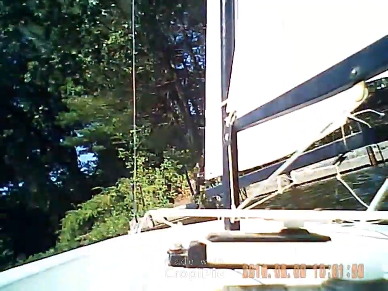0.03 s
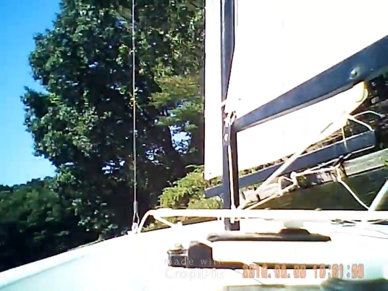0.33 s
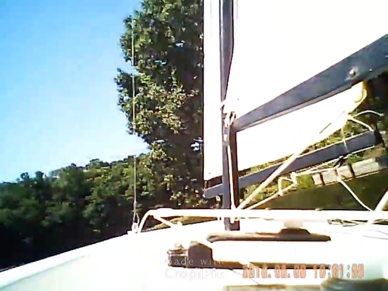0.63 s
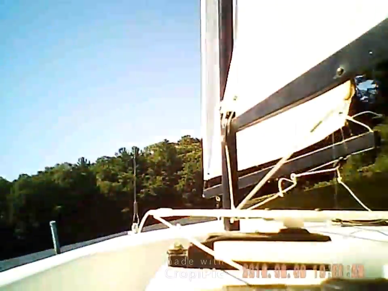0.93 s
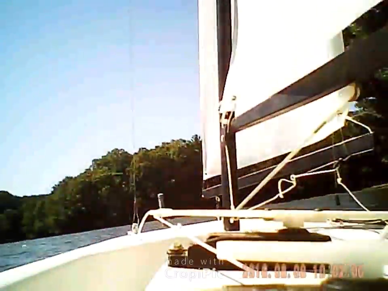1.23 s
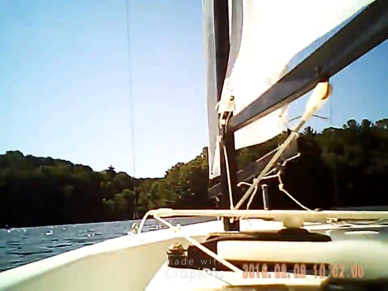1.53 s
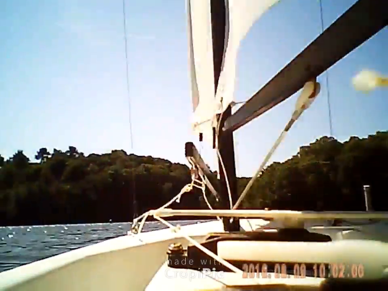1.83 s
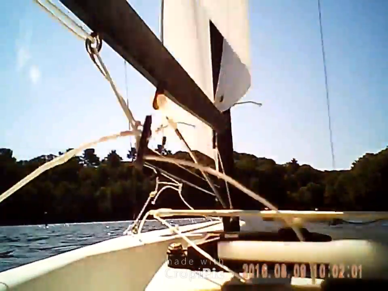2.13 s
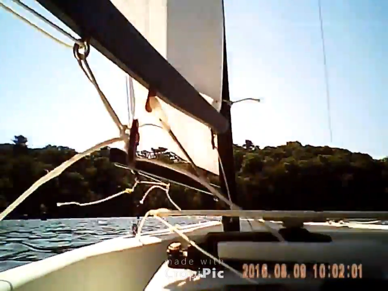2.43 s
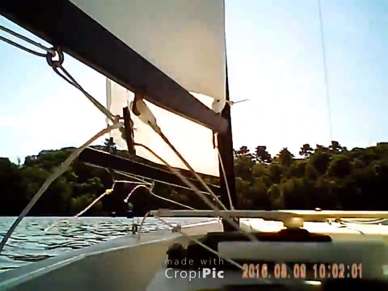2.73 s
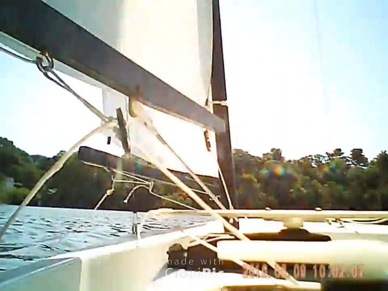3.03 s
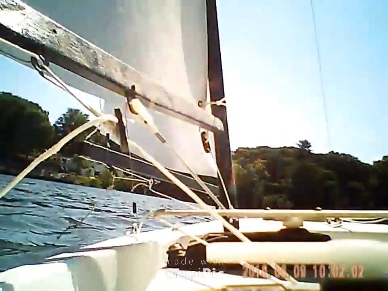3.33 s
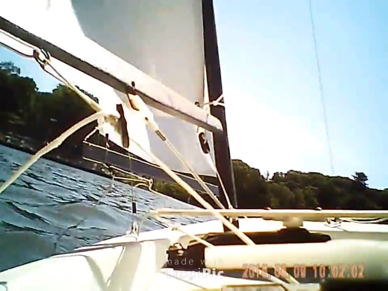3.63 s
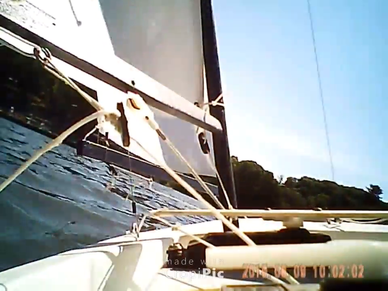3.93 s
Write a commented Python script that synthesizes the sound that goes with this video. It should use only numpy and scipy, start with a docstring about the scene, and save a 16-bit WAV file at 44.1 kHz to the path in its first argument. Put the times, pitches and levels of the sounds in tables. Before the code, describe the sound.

Lines scrape across a model sailboat's thin hull with sharp clicks, then squeak as the boom knocks. A small winch whirrs briefly before another knock. Soft lake water and wind rumble reach the microphone on deck.

```python
"""On a lake, a model sailboat gybes, heard from its deck.
Lines rub and drag over the thin hull as the boom swings across; boom and blocks knock, fittings tick.
The sail winch whirrs briefly; a faint chirp and thin hums pass. Water washes along the hull and wind
buffets the microphone. The recorder hisses and, resting off centre, clips the loudest downward swings."""
import sys
import numpy as np
from scipy import signal
from scipy.fft import rfft, irfft
from scipy.io import wavfile
from scipy.ndimage import uniform_filter1d

SR = 44100
rng = np.random.default_rng(int(sys.argv[2]) if len(sys.argv) > 2 else 0)


def int16_out(signal):
    """Quantize to a 16-bit WAV file."""
    q = np.round(np.clip(np.atleast_2d(signal).T, -1, 1) * 32767)
    wavfile.write(sys.argv[1], SR, q.astype(np.int16))


N = 176400
T = np.arange(N) / SR

# water spectrum (frequency [Hz], gain [dB])
WATER_COLOUR = [(100, -11), (200, 0), (300, -1.5), (420, 3), (560, -2.5), (700, 0), (1000, 0.5), (1550, 0),
                (1800, -5), (2100, -11), (2900, -18.5), (3500, -27), (5000, -30.5), (11000, -47)]
# water envelope (time [s], level [dB])
WATER_LEVEL = [(0, -31.5), (.5, -31.5), (1.3, -30), (1.8, -33), (2.2, -25.5), (2.7, -33), (3.2, -32.5),
               (3.6, -29), (4, -31.5)]
# wind spectrum (frequency [Hz], gain [dB])
WIND_COLOUR = [(10, -1), (30, -3), (70, -2.5), (130, -5.5), (220, -13), (500, -35.5), (2000, -112)]
# wind thumps (time [s], width [s], level [dB])
BUFFETS = [(.51, 0.016, -37), (1.25, 0.039, -40), (2.3, 0.057, -32), (2.74, .025, -35), (3.32, 0.03, -29.5),
           (3.54, 0.096, -32), (3.821, 0.041, -37)]
# hull and deck modes (frequency [Hz], gain [dB], t60 [s])
HULL_MODES = [(196, -11, 0.067), (426, 4, 0.074), (434, 1.5, 0.15), (685, 3, 0.06), (850, 1, 0.067),
              (1061, -1.5, 0.09), (1280, -0.5, 0.035), (1550, -1, 0.047), (1710, 8.5, .025),
              (2230, -1.5, 0.017), (2670, 4.5, 0.026), (3680, -5, .01), (4200, -11, .01), (5600, -12, .01),
              (6600, -3, 0.014)]
# boom and block hits (time [s], level over first 20 ms [dB], excitation centre [Hz])
KNOCKS = [(.065, -27, 1620), (.174, -29.5, 1480), (0.211, -26, 696), (0.222, -27, 380), (0.977, -19, 700),
          (1.405, -31, 596), (1.54, -32.5, 1300), (1.934, -30, 750), (1.948, -30, 650), (2.124, -31, 1200),
          (2.148, -25.5, 1200), (2.222, -20, 840), (2.231, -21, 740), (2.245, -25, 320), (3.582, -28, 450),
          (3.693, -13.5, 1500), (3.701, -19, 420), (3.709, -22, 500)]
# fitting hits (time [s], level [dB], ring [Hz], crack re ring [dB])
TICKS = [(.066, -26.5, 2370, -2), (.783, -4, 1515, -21), (.828, -8, 1530, -17), (1.133, -13, 1470, -15),
         (1.195, -17, 1490, -15), (2.378, -3.5, 1400, -16.5), (2.737, -25.5, 2200, -7),
         (2.785, -15.5, 1360, -26), (3.275, -16, 1400, -24), (3.645, -15.5, 1140, -27),
         (3.798, -14.5, 1750, -29)]
# slack-line rubs (peak time [s], rise [s], fall [s], level [dB], squeak [Hz], scrape share [0-1])
RUBS = [(.068, .003, .007, -27.5, 2280, 0.8), (.29, 0.0097, 0.0095, -25, 1940, 0),
        (.38, 0.065, .05, -43.5, 2640, 0.2), (.44, .014, 0.0081, -27, 1180, .1),
        (.6, .006, 0.0053, -32, 2480, 0.4), (1.316, 0.016, 0.032, -24.5, 1490, 0.5),
        (1.408, 0.04, 0.016, -27, 1460, 0.14), (1.485, 0.014, .015, -32, 1550, 0.4),
        (1.545, 0.0079, .01, -28, 1390, .7), (1.66, 0.06, 0.021, -30, 1200, 1),
        (1.975, 0.043, 0.019, -22.5, 1500, 0.6), (2.07, 0.028, 0.05, -29, 1480, 0.32),
        (2.139, 0.022, 0.024, -18, 1380, 0.94), (2.19, 0.03, 0.028, -27.5, 1450, 0),
        (2.235, 0.016, 0.033, -24, 1620, 0.56), (2.345, 0.023, 0.045, -21.5, 1630, 0),
        (2.384, 0.022, 0.031, -19, 1460, 0), (2.43, 0.013, 0.023, -25.5, 1540, 0.48),
        (3.028, 0.052, 0.023, -29, 1440, .7)]
# rub scrape spectrum (frequency [Hz], gain [dB])
SCRAPE_COLOUR = [(100, -10), (300, -21), (420, -0.5), (560, -3.5), (750, -6.5), (1000, 2), (1500, 2),
                 (1850, -2.5), (2200, -10), (2900, -14), (3600, -21.5), (4800, -34.5), (6500, -29.5),
                 (8000, -39), (11000, -40.5)]
# short winch runs (start [s], length [s], level [dB])
WINCH_TWITCHES = [(0.176, 0.063, -32), (3.799, 0.065, -33), (3.93, .05, -31)]
# long winch pull (time [s], whine fundamental [Hz], level [dB])
WINCH_PULL = [(3.345, 618.5, -30), (3.365, 694, -24.5), (3.385, 795, -22.5), (3.405, 1088, -24.5),
              (3.427, 1214, -20.5), (3.448, 1072, -25.5), (3.48, 1091, -21), (3.503, 1021, -26.5),
              (3.52, 1019, -21), (3.54, 1069, -21.5), (3.565, 1234, -23), (3.586, 1202, -20.5),
              (3.598, 1143, -28), (3.625, 1004, -45)]
# gear whine partials (harmonic number, gain [dB])
WHINE_HARMONICS = [(1, 0.5), (2, -3), (3, -22), (4, -21.5)]
# gearbox and mount modes (frequency [Hz], width [Hz], gain [dB])
GEARBOX_MODES = [(463, 60, -3), (1020, 49, 8), (1170, 72, 5), (1384, 140, 4.5), (1970, 95, 3.5),
                 (2190, 46, 0), (2430, 106, -1), (2890, 175, -5.5), (3970, 280, -16.5), (4700, 110, -15.5),
                 (5460, 93, -13.5), (6150, 310, -21.5), (7000, 400, -23), (8560, 590, -28),
                 (10600, 970, -32.5)]
# falling whistle (start [s], length [s], from [Hz], to [Hz], level [dB])
CHIRPS = [(0.537, 0.058, 5100, 2500, -51)]
# line drag envelope (time [s], level [dB])
DRAG_LEVEL = [(.55, -45), (.6, -27), (.645, -17.5), (.69, -12), (.75, -12.5), (.795, -17), (.84, -11),
              (.872, -10.5), (.89, -14.5), (.93, -14.5), (.975, -13), (1.04, -18), (1.1, -14.5),
              (1.12, -23), (1.155, -16), (1.185, -26), (1.22, -21.5), (1.265, -40)]
# line drag spectrum (frequency [Hz], gain [dB])
DRAG_COLOUR = [(100, -19), (190, -12), (300, -17.5), (600, -12), (950, -6.5), (1250, 0.5), (1550, 0.5),
               (1800, -1.5), (2100, -10), (2700, -18.5), (3300, -31), (5500, -46), (11000, -53)]
# deck modes under the line (frequency [Hz], width [Hz], gain [dB])
DECK_MODES = [(430, 40, 0), (720, 37, 0)]
# line crackle envelope (time [s], level [dB])
CRACKLE_LEVEL = [(.65, -60), (.685, -22.5), (.72, -25), (.765, -35), (.81, -46), (.835, -24), (.86, -20),
                 (.9, -34.5), (.98, -32), (1.04, -38), (1.1, -45), (1.16, -41), (1.24, -41)]
# line crackle spectrum (frequency [Hz], gain [dB])
CRACKLE_COLOUR = [(800, -21), (1800, -2), (2500, 10), (3400, -1), (5000, -10.5), (6800, -13.5), (8000, -23),
                  (11000, -30)]
# thin tones (start [s], length [s], pitch [Hz], level [dB])
HUMS = [(1.518, 0.053, 752, -32), (1.596, 0.048, 754, -31), (3.805, 0.16, 688, -36)]


def undb(db):
    """Decibels to gain."""
    return 10 ** (np.asarray(db) / 20)


def unit(x):
    """Scale to rms 1."""
    return x / np.sqrt(np.mean(x ** 2) + 1e-18)


def curve(points):
    """Gain along (time [s], level [dB]) points; silent outside."""
    time_s, db = np.array(points).T
    return undb(np.interp(T, time_s, db, left=-120, right=-120))


def walk(rate_hz):
    """Smooth random wander, spread near 1."""
    hold = int(SR / rate_hz)
    steps = np.repeat(rng.standard_normal(N // hold + 1), hold)
    return 1.64 * uniform_filter1d(uniform_filter1d(steps, hold), hold)[:N]


def colour(x, points):
    """Minimum-phase filter through (frequency [Hz], gain [dB]) points; output rms 1."""
    hz, db = np.array(points).T
    bins_hz = np.maximum(np.fft.rfftfreq(N, 1 / SR), 1)
    gain = undb(np.interp(np.log(bins_hz), np.log(hz), db))
    cepstrum = irfft(np.log(gain), N)
    cepstrum[1:N // 2] *= 2
    cepstrum[N // 2 + 1:] = 0
    return unit(irfft(rfft(x) * np.exp(rfft(cepstrum)), N))


def resonate(x, hz, width_hz):
    """One resonance, gain 1 at centre."""
    return signal.lfilter(*signal.iirpeak(hz, hz / width_hz, fs=SR), x)


def grains(per_s, scatter_db):
    """Random tiny impacts, a few much stronger; rms 1."""
    hit = rng.random(N) < per_s / SR
    size = np.minimum(rng.exponential(size=N), 5)
    return unit(hit * rng.choice([-1, 1], N) * undb(scatter_db * size))


def ring(t, hz, t60_s):
    """One struck mode."""
    return np.sin(2 * np.pi * hz * t) * np.exp(-np.log(1000) * t / t60_s)


def arched_tone(hz):
    """Sine along a pitch track; swells and fades."""
    u = np.linspace(0, 1, len(hz))
    return np.sqrt(8 * u * (1 - u)) * np.sin(2 * np.pi * np.cumsum(hz) / SR)


def add(out, start_s, x):
    """Mix x in at start_s."""
    i = max(int(start_s * SR), 0)
    out[i:i + len(x)] += x[:N - i]


def water(swell_db=0.33):
    """Ripples patter on the hull."""
    patter = colour(grains(per_s=3000, scatter_db=2.5), WATER_COLOUR)
    return patter * curve(WATER_LEVEL) * undb(swell_db * walk(16))


def wind(base_db=-38, gust_db=2):
    """Low turbulence at the microphone, with a few stronger buffets."""
    breeze = undb(base_db + gust_db * walk(9.1))
    buffets = sum(undb(db) * np.exp(-((T - at_s) / width_s) ** 2) for at_s, width_s, db in BUFFETS)
    return colour(rng.standard_normal(N), WIND_COLOUR) * (breeze + buffets)


def knocks(contact_s=0.0039, rattle=0.57, slope_db_per_oct=5.5):
    """Boom and blocks strike with brief contact chatter; the hull rings."""
    out, t = np.zeros(N), T[:SR // 5]
    for at_s, db, centre_hz in KNOCKS:
        chatter = rng.standard_normal(len(t)) * np.exp(-t / contact_s)
        force = rattle * chatter / np.sqrt(contact_s * SR / 2)
        force[0] += 1
        detune = 1 + 0.01 * rng.standard_normal(len(HULL_MODES))
        hull = np.zeros(len(t))
        for k, (hz, mode_db, t60_s) in enumerate(HULL_MODES):
            gain = undb(mode_db - slope_db_per_oct * abs(np.log2(hz / centre_hz)))
            hull += (-1) ** k * gain * ring(t, hz * detune[k], t60_s)
        blow = signal.fftconvolve(force, hull)[:len(t)]
        add(out, at_s, undb(db) * blow / np.std(blow[:SR // 50]))
    return out


def ticks(t60_s=0.021, crack_s=0.00048):
    """Small hard fittings: a sharp crack and one short ring each."""
    out, t = np.zeros(N), T[:SR // 10]
    for at_s, db, hz, crack_db in TICKS:
        crack = undb(crack_db) * rng.standard_normal(len(t)) * np.exp(-t / crack_s)
        add(out, at_s, undb(db) * (ring(t, hz, t60_s) + crack))
    return out


def rubs(width_hz=315):
    """Slack lines brush the deck: part scrape, part squeak."""
    out = np.zeros(N)
    slips = grains(per_s=2200, scatter_db=1.5)
    scrape = colour(slips, SCRAPE_COLOUR)
    for peak_s, rise_s, fall_s, db, hz, share in RUBS:
        swell = np.exp(-((T - peak_s) / np.where(T < peak_s, rise_s, fall_s)) ** 2)
        squeak = unit(resonate(resonate(slips, hz, width_hz), hz, width_hz))
        out += undb(db) * swell * unit((1 - share) * squeak + share * scrape)
    return out


def gear_whine(hz, wobble=0.02814, rough_db=3, low_cut_hz=930):
    """Gears whine in rough, wobbling harmonics."""
    phase = 2 * np.pi * np.cumsum(hz * (1 + wobble * walk(500))) / SR
    out = np.zeros(N)
    for k, db in WHINE_HARMONICS:
        gain = undb(db + rough_db * walk(250)) / (1 + (low_cut_hz / (k * hz)) ** 8)
        out += gain * np.sin(k * phase)
    return out


def gear_clatter(tooth_hz=403, jitter=0.12, scatter_db=0.5, noise_db=-6):
    """Loose teeth strike unevenly; gearbox and mount ring."""
    timing, strength = rng.standard_normal((N // 50, 2)).T
    hits = (np.cumsum(np.abs(1 + jitter * timing)) * SR / tooth_hz).astype(int)
    teeth = np.bincount(hits[hits < N], undb(scatter_db * strength[hits < N]), N)
    drive = unit(teeth) + undb(noise_db) * rng.standard_normal(N)
    return unit(sum((-1) ** k * undb(db) * resonate(drive, hz, width_hz)
                    for k, (hz, width_hz, db) in enumerate(GEARBOX_MODES)))


def winch(ramp_s=0.0086, top_speed_clatter_db=0.5):
    """Long pull: the motor spins up, sags under load, recovers. Short twitches: clatter only."""
    time_s, whine_hz, pull_db = np.array(WINCH_PULL).T
    hz = np.interp(T, time_s, whine_hz)
    whine, clatter = gear_whine(hz), gear_clatter()
    gears = whine + undb(top_speed_clatter_db) * clatter * hz / hz.max()
    out = curve(np.c_[time_s, pull_db]) * gears
    for start_s, length_s, db in WINCH_TWITCHES:
        inside_s = np.minimum(T - start_s, start_s + length_s - T)
        out += undb(db) * np.clip(inside_s / ramp_s + 0.5, 0, 1) * clatter
    return out


def chirps(wobble=0.02):
    """A faint whistle slides down."""
    out = np.zeros(N)
    for start_s, length_s, from_hz, to_hz, db in CHIRPS:
        n = int(length_s * SR)
        hz = np.linspace(from_hz, to_hz, n) * (1 + wobble * walk(600)[:n])
        add(out, start_s, undb(db) * arched_tone(hz))
    return out


def drag(judder_db=0.64):
    """A taut line catches and slips over the deck, crackling where it bites hardest."""
    slips = grains(per_s=5000, scatter_db=2) * undb(judder_db * walk(130))
    deck = sum(undb(db) * resonate(slips, hz, width_hz) for hz, width_hz, db in DECK_MODES)
    crackle = colour(grains(per_s=2400, scatter_db=2.5), CRACKLE_COLOUR)
    return colour(slips + deck, DRAG_COLOUR) * curve(DRAG_LEVEL) + crackle * curve(CRACKLE_LEVEL)


def hums(wobble=0.008):
    """Faint wavering tones come and go."""
    out = np.zeros(N)
    for start_s, length_s, hz, db in HUMS:
        waver = 1 + wobble * walk(92)[:int(length_s * SR)]
        add(out, start_s, undb(db) * arched_tone(hz * waver))
    return out


def scene():
    """Mono sum at the deck."""
    return (water() + wind() + knocks() + ticks() + rubs() + winch() + chirps() + drag() + hums())[None]


def lowpass(x, hz):
    """Steep treble cut."""
    return signal.sosfilt(signal.ellip(8, 0.2, 70, hz, fs=SR, output="sos"), x)


def record(dry):
    """Hissy, band-limited recorder with a DC offset: downward swings hit the rail first."""
    hiss_db, offset = -49, -0.634
    hissy = dry + undb(hiss_db) * rng.standard_normal(dry.shape)
    clipped = np.clip(lowpass(hissy, hz=11400), -1 - offset, 1 - offset)
    return lowpass(clipped, hz=17000) + offset


dry = scene()
out = record(dry)
int16_out(out)
```